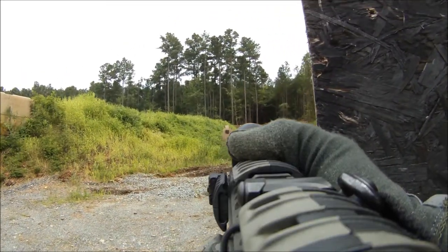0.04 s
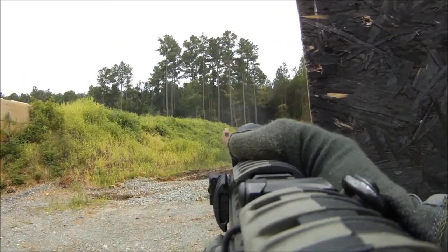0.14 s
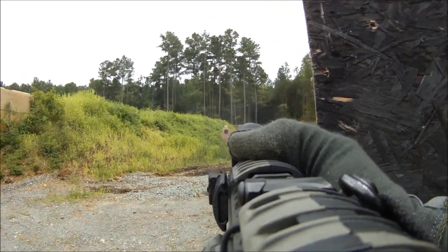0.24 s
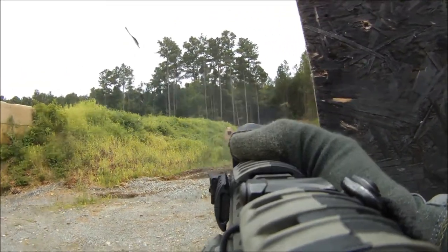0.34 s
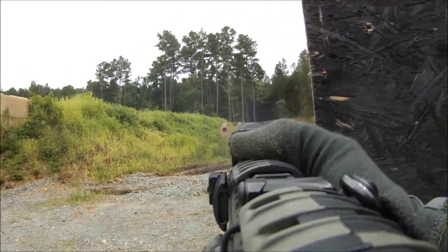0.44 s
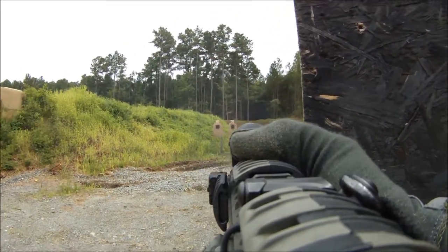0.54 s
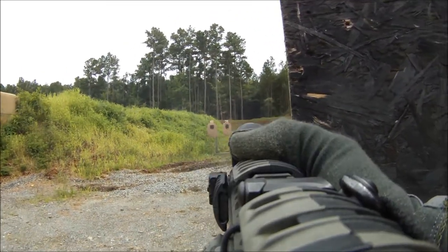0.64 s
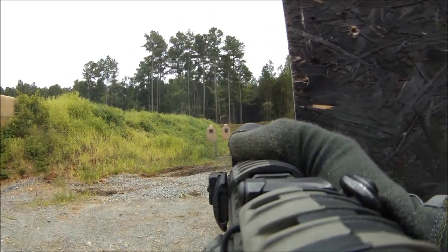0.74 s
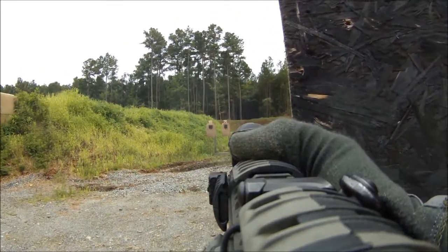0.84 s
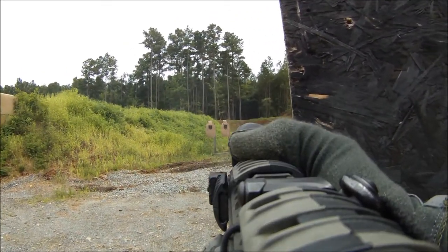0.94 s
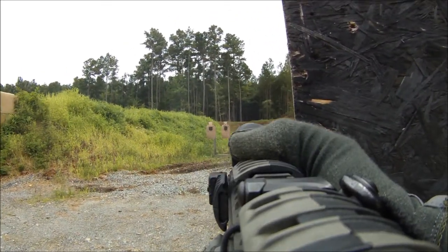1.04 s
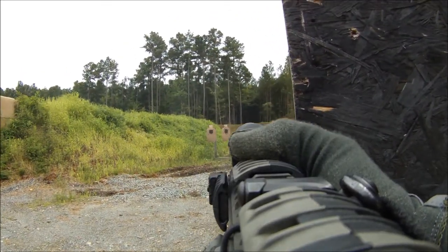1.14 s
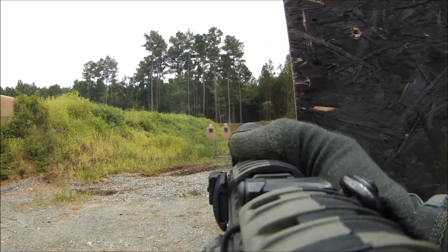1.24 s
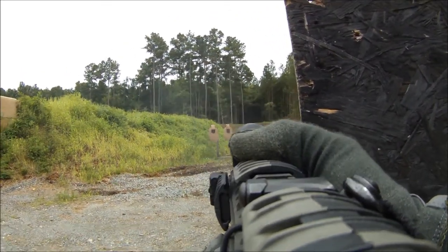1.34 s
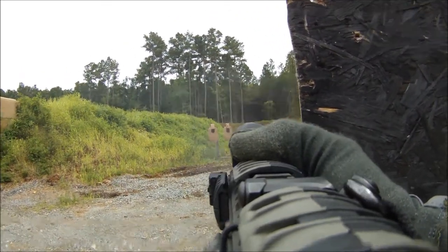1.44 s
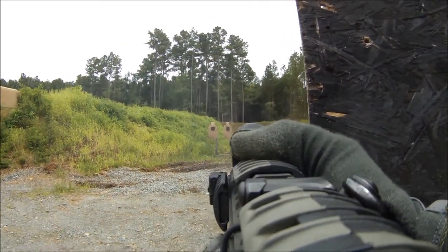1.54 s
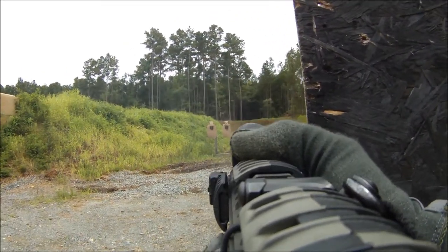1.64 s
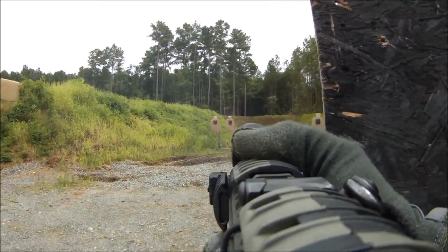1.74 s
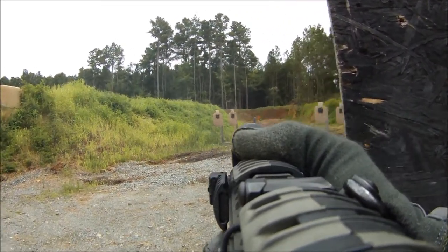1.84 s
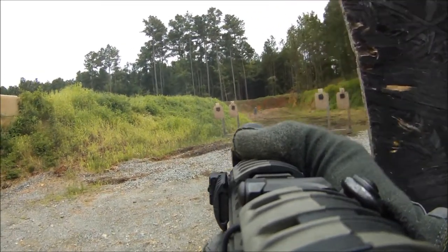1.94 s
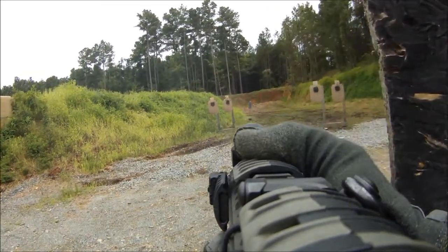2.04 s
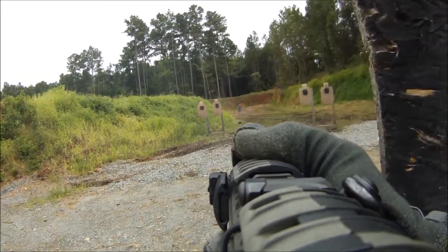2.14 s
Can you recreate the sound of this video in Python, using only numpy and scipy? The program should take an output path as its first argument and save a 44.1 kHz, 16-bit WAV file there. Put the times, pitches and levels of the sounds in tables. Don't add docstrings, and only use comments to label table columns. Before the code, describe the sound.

Rifle fires two quick pairs of loud, overloaded shots outdoors, with metallic action clatter and echo

```python
import sys
import numpy as np
from scipy import signal
from scipy.io import wavfile
from scipy.ndimage import uniform_filter1d

SR = 44100
rng = np.random.default_rng(int(sys.argv[2]) if len(sys.argv) > 2 else 0)


def unload_audio(sound):
    columns = np.transpose(np.atleast_2d(sound))
    steps = np.round(np.clip(columns, -1, 1) * 32767)
    wavfile.write(sys.argv[1], SR, steps.astype(np.int16))


def field_ratio(decibels):
    return 10 ** (np.asarray(decibels, dtype=float) / 20)


N = 94815
SHORT = 4410


def hiss():
    return rng.standard_normal(SHORT)


def evened(x):
    return x / np.sqrt(np.mean(x ** 2) + 1e-20)


def read(points, hz):
    f, value = np.transpose(points)
    return np.interp(np.log(hz + 1), np.log(f + 1), value)


def add(mix, s, sound):
    part = mix[round(s * SR):][:len(sound)]
    part += sound[:len(part)]


def resonate(x, hz, width):
    turn = np.exp(2j * np.pi * np.cumsum(hz * np.ones(len(x))) / SR)
    r = np.exp(-np.pi * width / SR)
    smooth = signal.lfilter([1 - r], [1, -r], x / turn + 1e-18)
    return 2 * (turn * smooth).real


def through(x, peaks):
    total = np.zeros(len(x))
    for hz, width, db in peaks:
        ringing = resonate(resonate(x, hz, width), hz, width)
        total += field_ratio(db) / np.sqrt(width) * ringing
    return evened(total)


def shape(rise, hold, t60):
    t = np.arange(SHORT) / SR
    return np.minimum(t / rise, 1) * field_ratio(-60 * np.maximum(t - rise - hold, 0) / t60)


def field(spectrum, level_db, patchy_db):
    frames, hz = N // 128 + 5, np.fft.rfftfreq(512, 1 / SR)[:, None]
    a, b, patches = rng.standard_normal((frames, 257, 3)).T
    patches = uniform_filter1d(patches, size=8, axis=0)
    patches = evened(uniform_filter1d(patches, size=6, axis=1))
    colour = field_ratio(read(spectrum, hz))
    colour = colour / np.sqrt(np.mean(colour ** 2))
    gain = colour * field_ratio(level_db(np.arange(frames) * 128 / SR, hz) + patchy_db * patches)
    return signal.istft((a + 1j * b) * gain, nperseg=512, noverlap=384)[1][:N] / 16


# (frequency [Hz], width [Hz], level [dB], rise [s], decay by 60 dB [s])
BLAST_LAYERS = [(6330, 1500, 10, .0002, 0.0086), (11000, 27000, -12.5, .0003, 0.012),
                (4500, 3300, 5.5, 0.00033, 0.049), (2465, 1600, 1.5, 0.0013, 0.1),
                (1863, 810, 3.5, .008, 0.032), (1100, 290, -3, 0.0073, .05), (665, 575, 5, 0.0026, 0.6),
                (301.3, 170, -8, .006, 0.067)]
# (frequency [Hz], width [Hz], level [dB])
LOOSE_PARTS = [(450, 200, 4), (1291.5, 310, -4.5), (2630, 1200, -1), (5500, 1800, -8)]


def blast(mix, start, noise):
    hold_s = .0139
    boom = np.zeros(SHORT)
    for hz, width, db, rise, t60 in BLAST_LAYERS:
        boom += field_ratio(db) * through(noise, [(hz, width, 0)]) * shape(rise, 0, t60)
    add(mix, start, boom * shape(.0001, hold_s, .004))
    add(mix, start + hold_s, field_ratio(-16) * through(hiss(), LOOSE_PARTS) * shape(.0005, .003, .03))


# (frequency [Hz], width [Hz], level [dB])
BODY_PEAKS = [(260, 260, -5), (313, 160, -1.5), (398, 190, -1.5), (572, 50, -2), (620.4, 53, -5.5),
              (1077, 500, -11), (1900, 380, -5.5), (2750, 700, -12.5)]


def body(mix, start, travel, noise):
    delay_s, rise_s, snaps_per_s = .0225, .008, 2500
    snap_sizes = field_ratio(3.5 * rng.exponential(1, SHORT))
    snaps = snap_sizes * hiss() * (rng.random(SHORT) < snaps_per_s / SR)
    hum = field_ratio(-13.5) * through(noise, BODY_PEAKS)
    crackle = field_ratio(-21) * through(snaps, LOOSE_PARTS[1:])
    stroke = shape(rise_s, travel - delay_s - rise_s, .038)
    add(mix, start + delay_s, (hum + crackle) * stroke)


# (frequency [Hz], width [Hz], level [dB])
REAR_PEAKS = [(600, 280, 10), (1570, 2700, 2), (3260, 830, -12), (9000, 8000, -27)]


def rear_hit(mix, start, noise):
    blow = noise * shape(.0001, .0008, .005)
    add(mix, start + .0436, field_ratio(-13.5) * through(blow, REAR_PEAKS))


# (frequency [Hz], width [Hz], level [dB])
STEEL_PEAKS = [(1500, 1000, -11), (2700, 1100, -5), (4100, 1300, -4), (5700, 1200, 0), (7200, 1400, -4),
               (9800, 3000, -14)]


def bolt_home(mix, locked, lock_db, bounce_db):
    slide_s, bounce_s, detune = .023, .014, .04
    steel = [(hz * (1 + detune * rng.standard_normal()), w, db) for hz, w, db in STEEL_PEAKS]
    add(mix, locked - slide_s, field_ratio(-22) * through(hiss(), steel) * shape(.006, slide_s, .02))
    add(mix, locked, field_ratio(lock_db - .5) * through(hiss(), steel) * shape(.002, .0045, .012))
    spike = shape(.0001, .001, .006)
    ring = field_ratio(-8) * shape(.002, .004, .014)
    add(mix, locked + bounce_s, field_ratio(bounce_db) * through(hiss(), steel) * (spike + ring))


# (frequency [Hz], width [Hz], level [dB])
HAMMER_PEAKS = [(3400, 1200, 0), (5140, 1500, -6.5), (8600, 500, -10.5)]


def hammer(mix, start, db):
    add(mix, start - .0042, field_ratio(db) * through(hiss(), HAMMER_PEAKS) * shape(.0005, .0022, .016))


# (blast time [s], hammer level [dB], lock level [dB], bounce level [dB])
SHOTS_FIRED = [
    (0.206, -3.5, 2, 0),
    (.3681, -30, 2.5, -3.5),
    (1.365, -22.5, 3, -1.5),
    (1.525, -32, 6, -4),
]
BOLT_TRAVELS = [
    .0872,
    .0778,
    .0855,
    .0710,
]


def gun():
    mix, vary = np.zeros(N), .4
    habit = rng.standard_normal((3, SHORT))
    for travel, (start, hammer_db, lock_db, bounce_db) in zip(BOLT_TRAVELS, SHOTS_FIRED):
        alike = np.sqrt(1 - vary ** 2) * habit + vary * rng.standard_normal((3, SHORT))
        hammer(mix, start, hammer_db)
        blast(mix, start, alike[0])
        body(mix, start, travel, alike[1])
        rear_hit(mix, start, alike[2])
        bolt_home(mix, start + travel, lock_db, bounce_db)
    return mix


# (time [s], level [dB])
RATTLE_TIMES = [(.2235, -14), (.263, -17.5), (0.28, -15.5), (.288, -16.5), (.400, -15.5), (.420, -14),
                (0.434, -12), (.438, -11), (1.382, -15), (1.403, -20), (1.437, -28.5), (1.4414, -16),
                (1.54, -10.5), (1.5543, -15), (1.5585, -2.5), (1.579, -14.5), (1.5865, -6.5)]


def rattles():
    mix = np.zeros(N)
    for s, db in RATTLE_TIMES:
        add(mix, s, field_ratio(db) * through(hiss(), LOOSE_PARTS) * shape(.0003, .0012, .02))
    return mix


# (frequency [Hz], level per Hz [dB])
NEAR_COLOUR = [(29, -67.5), (50, -28), (128, -5.5), (501, -1.5), (1130, -14), (1440, -17.5), (2960, -19),
               (6230, -30.5), (15500, -62)]
# (frequency [Hz], decay by 60 dB [s])
NEAR_DECAY = [(60, 1), (300, 0.36), (700, .6), (2500, 0.73), (6000, 0.68), (14000, 0.67)]
# (frequency [Hz], level per Hz [dB])
FAR_COLOUR = [(40, -40.5), (150, -24.5), (480, -7.5), (690, -5), (950, -9.5), (2200, -9), (5000, -24.5),
              (15500, -71.5)]
# (frequency [Hz], decay by 60 dB [s])
FAR_DECAY = [(100, 1.5), (400, 2.2), (700, 5.5), (1100, 3.0), (2000, 2.3), (8000, 1.5)]


def valley():
    def near_db(t, hz):
        dip = -.5 * np.exp(-((t - .2) / .05) ** 2)
        return -24.5 - 60 * (t - .15) / read(NEAR_DECAY, hz) + dip

    def far_db(t, hz):
        return -46.5 - 60 * t / read(FAR_DECAY, hz)

    tail = field(NEAR_COLOUR, near_db, 1.5) + field(FAR_COLOUR, far_db, 3.2)
    tail *= np.minimum(np.arange(N) / SR / .029, 1)
    thud = np.sin(2 * np.pi * 70 * np.arange(SHORT) / SR)
    add(tail, .265, field_ratio(-32) * thud * shape(.0089, .007, .071))
    return tail


# (frequency [Hz], level per Hz [dB])
OPEN_COLOUR = [(1000, -20), (2500, -1.5), (4500, 3.5), (8000, -14.5), (15500, -50)]


def open_range():
    return field(OPEN_COLOUR, lambda t, hz: -44 - 60 * t / 1.1, 2.4)


# (time [s], level [dB], decay by 60 dB [s])
CASE_TICKS = [
    (0.483, -22, .02),
    (.872, -56, .012),
    (1.044, -48.5, 0.0056),
    (1.478, -21, 0.011),
    (1.6682, -21, 0.01),
    (1.786, -27.5, .018),
    (2.0036, -31.5, 0.014),
    (2.1025, -47, 0.011),
]
# (frequency [Hz], width [Hz], level [dB])
BRASS_PEAKS = [(2800, 1100, 7), (4500, 1300, 7), (6000, 1800, 2), (8500, 1800, -15.5)]


def case_ticks():
    mix = np.zeros(N)
    for s, db, t60 in CASE_TICKS:
        add(mix, s, field_ratio(db) * through(hiss(), BRASS_PEAKS) * shape(.0005, .0012, t60))
    return mix


# (time [s], level [dB], frequency [Hz], decay by 60 dB [s])
GEAR_KNOCKS = [
    (.0265, -46, 463, 0.033),
    (.063, -74, 690, 0.024),
    (.079, -77.5, 500, .04),
    (.118, -79, 600, 0.012),
    (.170, -71, 1100, .03),
    (2.134, -48.5, 450, 0.089),
]


def gear_knocks():
    mix = np.zeros(N)
    for s, db, hz, t60 in GEAR_KNOCKS:
        peaks = [(hz, 500, 0), (2.4 * hz, 700, -2), (6.5 * hz, 1500, -15)]
        add(mix, s, field_ratio(db) * through(hiss(), peaks) * shape(.00084, .0018, t60))
    return mix


# (time [s], frequency [Hz], level [dB])
BIRD_NOTES = [
    [(0, 4850, -57), (.012, 4550, -65), (.027, 4350, -73)],
    [(.1, 7450, -74), (.126, 7800, -74), (.138, 7300, -66), (.147, 6450, -100)],
    [(.139, 5900, -65), (.153, 6400, -60), (.165, 5150, -59), (.18, 4500, -61), (.2, 3400, -66)],
]


def bird():
    mix = np.zeros(N)
    for note in BIRD_NOTES:
        s, hz, db = np.transpose(note)
        t = np.arange(s[0], s[-1], 1 / SR)
        tone = np.sin(2 * np.pi * np.cumsum(np.interp(t, s, hz)) / SR)
        flutter_db = 3.2 * evened(uniform_filter1d(rng.standard_normal(len(t)), size=120))
        add(mix, max(s[0], 0), np.sqrt(2) * field_ratio(np.interp(t, s, db) + flutter_db) * tone)
    return mix


# (frequency [Hz], level per Hz [dB])
BREEZE_COLOUR = [(25, 10.5), (75, 10), (160, -4), (500, -5), (1200, -10.5), (4000, -17), (7000, -35.5),
                 (15500, -46.5)]


def breeze():
    return field(BREEZE_COLOUR, lambda t, hz: -57 - 4.5 * t, 3)


def scene():
    mix, tail = gun(), valley()
    for start, *_ in SHOTS_FIRED:
        add(mix, start, tail)
    mix += rattles() + case_ticks() + gear_knocks() + bird() + breeze()
    add(mix, 1.6, open_range())
    side = field_ratio(-51) * np.roll(mix, round(.001 * SR))
    return np.array([mix + side, mix - side])


def band_limit(x):
    return signal.sosfilt(signal.butter(12, 16240, fs=SR, output="sos"), x)


def record(dry):
    knee = 2.2
    cut = signal.sosfilt(signal.butter(2, 150, "high", fs=SR, output="sos"), dry)
    cut = signal.lfilter(*signal.butter(1, 11000, fs=SR), cut)
    clipped = cut / (1 + abs(cut) ** knee) ** (1 / knee)
    sagged = field_ratio(-1) * signal.lfilter(*signal.butter(1, 216, "high", fs=SR), clipped)
    sagged = np.clip(sagged, -1, 1)
    limited = signal.oaconvolve(sagged, signal.firwin(255, 15900, fs=SR)[None], "same")
    return band_limit(limited)


dry = scene()
out = record(dry)
unload_audio(out)
```